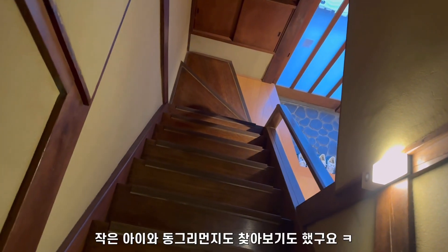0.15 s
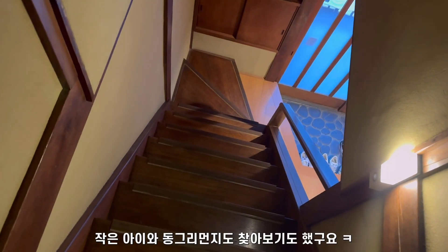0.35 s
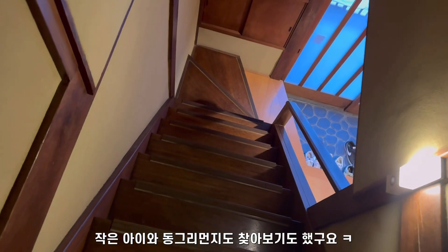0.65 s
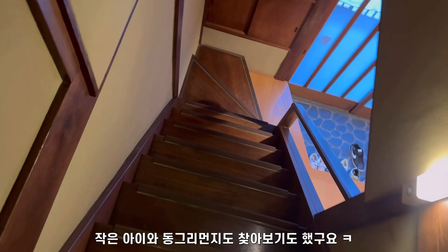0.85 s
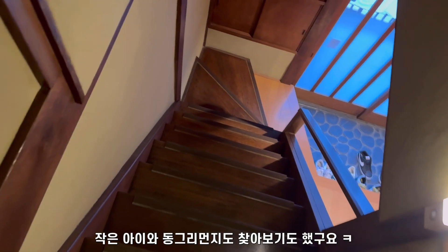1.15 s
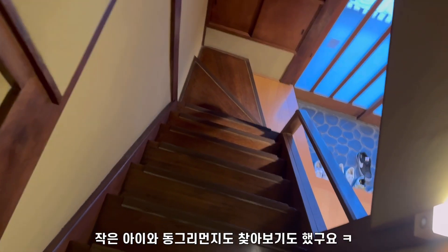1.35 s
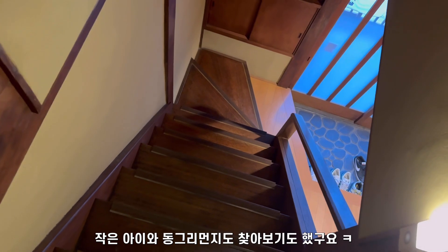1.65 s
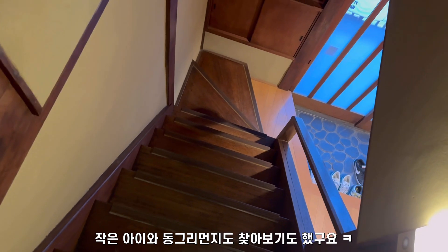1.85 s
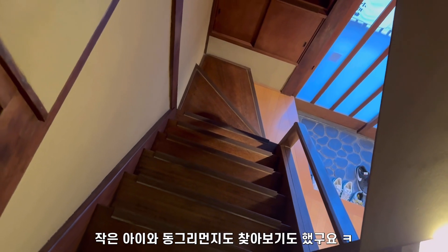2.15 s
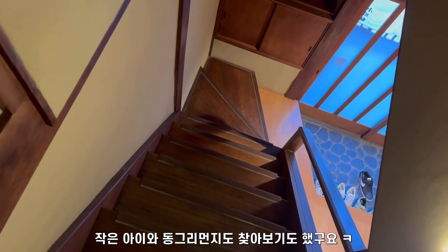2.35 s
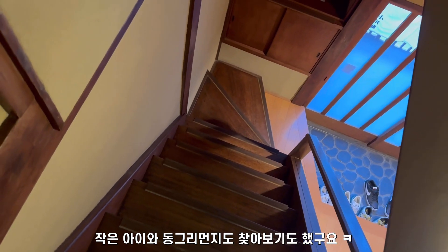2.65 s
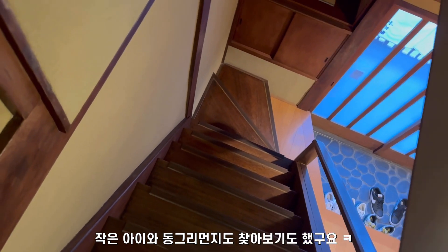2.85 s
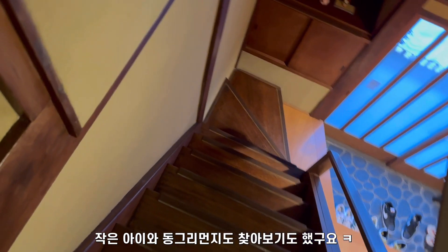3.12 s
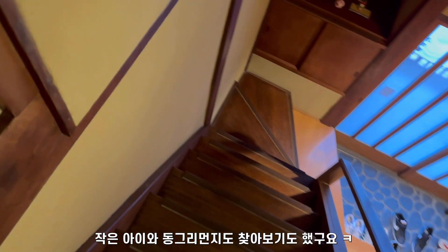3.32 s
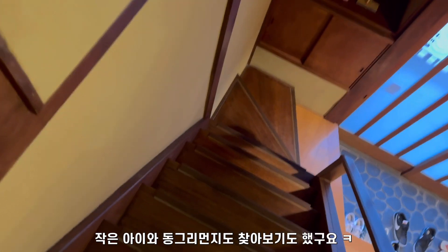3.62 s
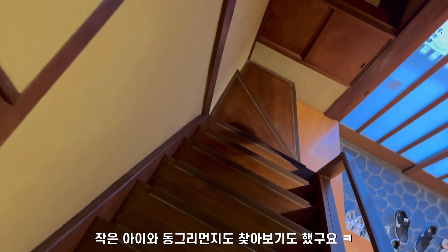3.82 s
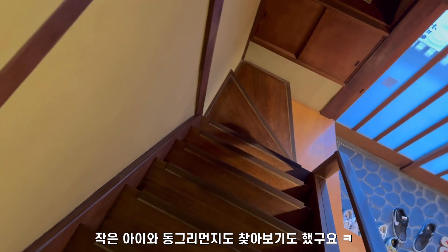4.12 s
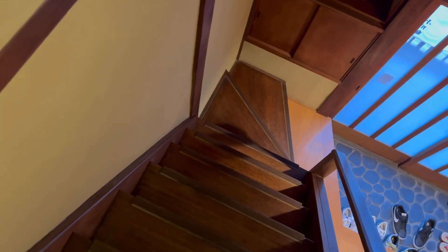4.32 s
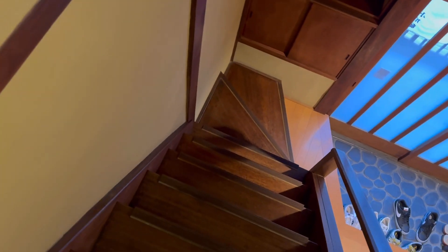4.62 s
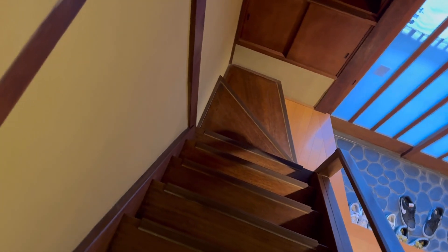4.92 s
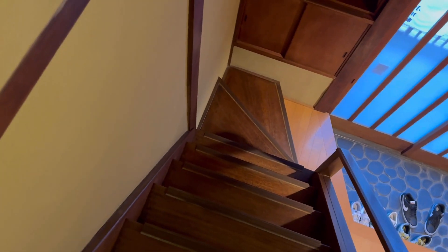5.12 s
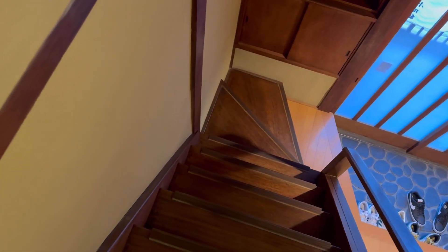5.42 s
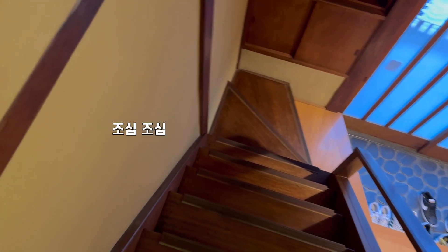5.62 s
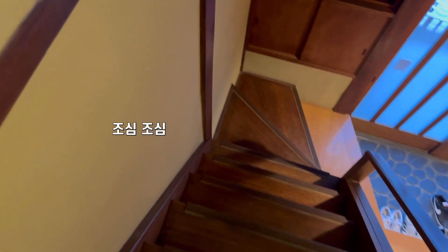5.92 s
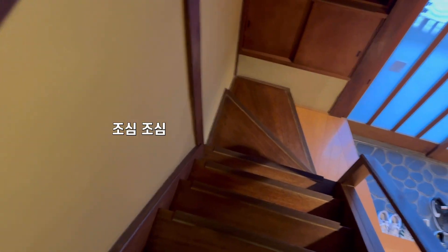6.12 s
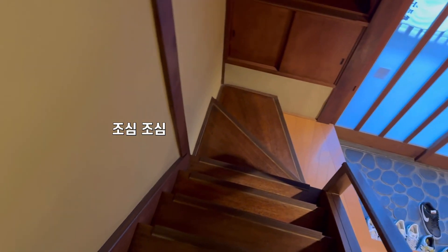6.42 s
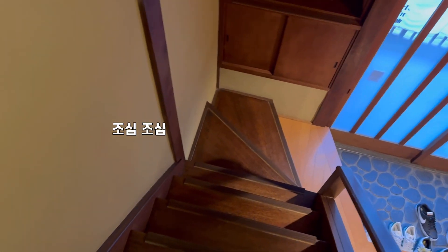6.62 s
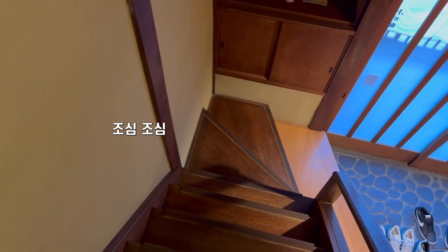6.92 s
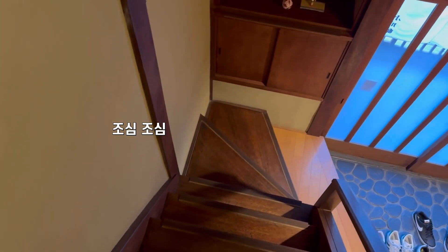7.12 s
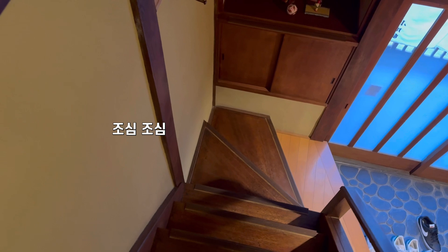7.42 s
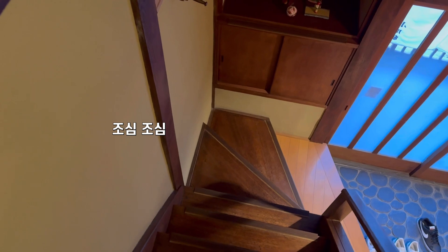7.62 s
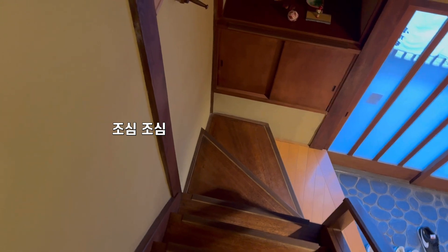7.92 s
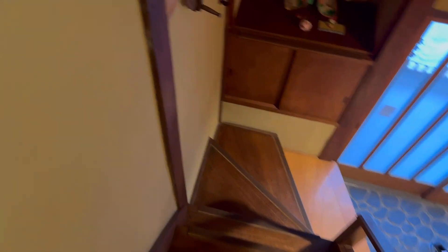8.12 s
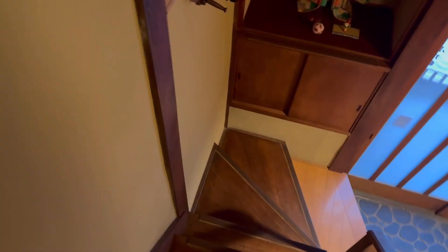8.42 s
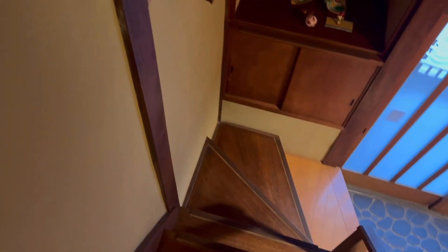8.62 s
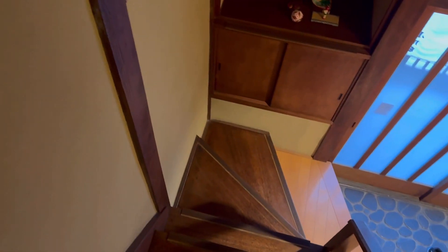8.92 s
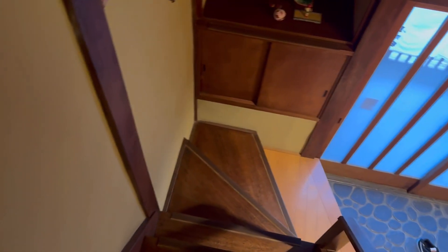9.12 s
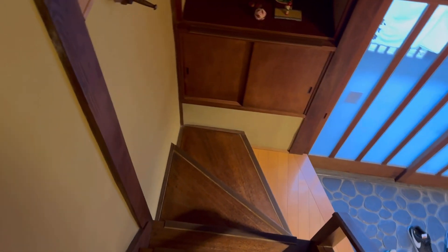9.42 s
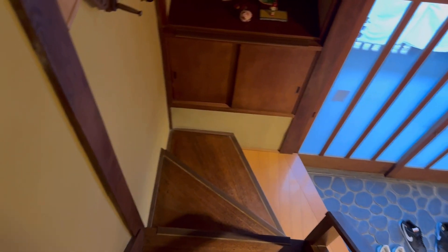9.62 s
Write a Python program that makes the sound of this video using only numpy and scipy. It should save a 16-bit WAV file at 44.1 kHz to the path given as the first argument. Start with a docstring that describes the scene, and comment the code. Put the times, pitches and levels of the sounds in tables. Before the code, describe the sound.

Close, quiet stereo sound inside a narrow wooden stairwell. Soft heels press old treads; early on the wood gives a harsh, rattling creak of many fast cracks that slow as it ends. A lull follows, then single snaps and knocks, the heaviest with a deep thump around three seconds, among uneven muffled steps, sock rubs and clothing rustle. Low timber rumble persists, and dull wash from outside swells last.

```python
"""Someone in socks comes slowly down a steep wooden staircase in an old house.
After faint cracks and soft steps, a loaded joint slips again and again in one long stuttering creak.
Then single cracks, thumping steps and rubbing socks follow; each crack rings briefly in the stairwell.
Clothes brush and timber rumbles all along; the wash from outside grows towards the end.
Wood is made of fading sine waves, cracks of short noise bursts, cloth and wash of coloured noise."""
import sys
import numpy as np
from scipy import signal
from scipy.fft import rfft, irfft, next_fast_len
from scipy.io import wavfile
from scipy.ndimage import uniform_filter1d

SR = 44100
rng = np.random.default_rng(int(sys.argv[2]) if len(sys.argv) > 2 else 0)


def master(y):
    """Save y as 16-bit WAV."""
    cut = np.clip(np.atleast_2d(y).T, -1, 1)
    pcm = np.round(cut * 32767)  # scale
    wavfile.write(sys.argv[1], SR, pcm.astype(np.int16))


N = 429975  # length in samples

# Joints slipping under load: start_s, level_db, then against that level snap_db (treble) and knock_db (wood),
# knock_hz (pitch the tread favours), grip_hz (lowest resonance of the gripping fibres)
JOINT_SLIPS = [(0.0448, -50, -31, 10, 314, 1190), (0.0863, -48, -4.5, 4, 316, 1175),
               (0.1388, -49, -22, 15, 310, 1144), (0.751, -27.5, -7.5, 6, 720, 1984),
               (0.7832, -24, -6, 5, 444, 1980), (0.8257, -23.5, -4.5, 4.5, 460, 2000),
               (0.852, -23.5, -5.5, 1, 301, 1920), (0.8815, -23.5, -5.5, 7, 440, 1945),
               (0.9099, -23, -7, 6, 680, 1970), (0.9312, -24, -4, 7, 683, 1970),
               (0.9497, -23.5, -5.5, 5, 298.3, 1963), (0.9708, -23, -5.5, 0.5, 395.7, 1970),
               (0.9867, -23, -3, 2, 450, 1900), (1.008, -19.5, -4.5, 3.5, 460, 1952),
               (1.0305, -24.5, -3.5, 7, 729, 1561), (1.0499, -24, -1.5, 7, 715, 1854),
               (1.0775, -20.5, -9, 5.5, 511.5, 1460), (1.1135, -27, -3.5, 12, 720, 1405),
               (1.1477, -23, -5, 2.5, 430, 1520), (1.2133, -28.5, -3, 12, 880, 1430),
               (1.303, -26.5, -4, 13.5, 930, 1443), (2.0459, -60, -5, 8, 436, 1576),
               (2.2374, -42.5, -6, 8, 383, 1535), (2.25, -46.5, 2.5, 17, 390, 1500),
               (2.571, -44.5, -17, 9, 450, 1010), (2.7512, -62, 4, 0, 304, 1920),
               (3.1263, -52.5, 9, 11, 396, 1440), (3.2068, -28, -13.5, -2.5, 400, 1610),
               (3.2292, -27.5, -8.5, 3.5, 296, 1930), (3.356, -55, 0, 12.5, 312, 1860),
               (3.3789, -35, 2.5, 4.5, 570, 1490), (3.5981, -50.5, -1.5, 12.5, 331, 1820),
               (4.001, -42.5, 3.5, 7, 385, 1470), (4.0519, -36.5, -2.5, 11.5, 478, 1000),
               (4.112, -50, -10.5, 1, 400, 1520), (4.535, -70.5, -8, 18.5, 418, 1500),
               (4.5924, -30, -3.5, 3.5, 406, 1910), (4.8843, -61, 5, 6.5, 420, 2000),
               (5.0064, -46, -3, 7.5, 393, 2380), (5.372, -62, -1.5, -19.5, 883, 1496),
               (5.4886, -36, -17.5, 7, 424, 1730), (5.753, -60, -2, 9, 427, 1540),
               (5.832, -45.5, -5, -4, 336, 1940), (5.8738, -39, -25, 3, 392, 1604),
               (5.9856, -44, -8, 4.5, 304, 1270), (6.0208, -54.5, -0.5, -8, 318, 1710),
               (6.2014, -60, -11, 5.5, 439, 1400), (7.013, -60, -5, 5, 303, 2360),
               (7.1906, -32, -8, 5, 503, 1287), (7.329, -59, 4, -5, 297, 2170),
               (7.5597, -57.5, -1, 13, 310, 2000), (8.109, -65.5, -17, 14, 920, 1440),
               (8.203, -29, -8.5, 6, 286, 1348), (8.2842, -56.5, 5.5, 11, 490, 1430),
               (8.349, -68.5, 14, 1, 568, 1840), (8.4268, -52.5, -2.5, -16, 511, 1480),
               (8.479, -49.5, -6.5, -5, 316, 1980), (8.6192, -63, -6.5, 7.5, 374, 1200),
               (9.046, -69.5, 1, 18, 450, 1520), (9.12, -59.5, -2.5, 1, 409, 1850)]
# Weight landing on a tread: landing_s, board_peak_db, beam_peak_db, frame_peak_db, contact_ms
FOOTFALLS = [(0.053, -43, -61, -56, 13), (0.142, -43, -51, -62, 10), (0.383, -44.5, -39, -67, 15.5),
             (0.554, -45.5, -68, -67, 17), (0.922, -27, -56, -43, 15), (0.998, -23, -52, -38.5, 13),
             (1.218, -26.5, -45, -36, 7.5), (1.307, -26.5, -40, -52.5, 2.4), (1.688, -56.5, -69, -62.5, 20),
             (2.054, -45.5, -77, -61, 49), (2.248, -37.5, -52, -56, 8.2), (2.348, -54, -64, -69, 19),
             (2.518, -53, -67, -65, 7.1), (2.561, -42, -50.5, -57, 19), (2.772, -51, -50, -68, 5.3),
             (2.971, -63, -60.5, -76, 14), (3.136, -48, -62, -71, 7.8), (3.241, -24.5, -37, -41, 17),
             (3.383, -30.5, -27, -23.5, 18), (3.604, -40, -52, -60.5, 25), (3.677, -44, -53, -50, 8.4),
             (3.866, -57.5, -64.5, -79, 14), (4.009, -38, -50, -67, 10), (4.066, -38, -42.5, -53, 21),
             (4.54, -43, -72, -50, 32), (4.791, -60, -62, -56.5, 32), (5.005, -42, -55, -51.5, 18),
             (5.5, -44.5, -57, -53.5, 71), (5.751, -62, -75, -58, 25), (5.837, -42.5, -65, -40, 18),
             (6.008, -48, -50, -39.5, 15), (6.205, -50.5, -71, -65, 8.2), (6.424, -47.5, -58, -54, 24),
             (6.548, -62.5, -60, -65, 29), (6.862, -64.5, -59, -76, 14), (7.044, -51, -54, -56, 5),
             (7.204, -39, -68, -65, 36), (7.335, -42.5, -55, -49, 14), (7.493, -52.5, -51.5, -86, 31),
             (7.562, -44.5, -47, -59, 14), (7.917, -57.5, -56, -57.5, 27), (8.115, -49, -57, -63, 17),
             (8.2, -30.5, -30, -35.5, 25), (8.354, -49, -69, -48, 35), (8.494, -40, -57, -50, 18.4),
             (8.615, -57, -61, -67, 12), (8.85, -53.5, -53.5, -58, 32), (9.045, -50, -47, -64, 12),
             (9.116, -50, -61, -73.5, 18), (9.336, -49.5, -73, -58.5, 14.4), (9.633, -56.5, -74, -62, 18)]
# Ringing tones of the staircase, by part: frame, beams, boards, treads. Columns: pitch_hz,
# level_db (relative), t60_s (time to fall by 60 dB, before the foot shortens it)
FRAME_TONES = [(39.2, -11, 0.94), (50.7, -7.5, 1), (59.64, 14, 0.49)]
BEAM_TONES = [(71.15, -9.5, 0.98), (85.4, -2, 0.28), (102.4, -4.5, 0.15)]
BOARD_TONES = [(118.8, -4.5, 0.34), (146.64, -1, 0.41), (161.3, -8.5, 0.4), (186.5, -7, 0.32),
               (232.3, -10, 0.24)]
TREAD_TONES = [(274.4, -4, 0.33), (310, -2, 0.23), (350.8, -15, 0.57), (400.3, -3, 0.22),
               (448.2, 0.5, 0.25), (498, -5.5, 0.26), (561, -1, 0.23), (604.5, -13, 0.3), (683, 3, 0.11),
               (736.4, -3.5, 0.26), (772.5, -9, 0.14), (923.5, 0.5, 0.087), (980, -5.5, 0.32),
               (1065, 0, 0.089), (1246, 2, 0.16), (1219, -1, 0.14), (1440, -15.5, 0.068),
               (1619, -12.5, 0.087)]
# Bands of a crack and its echo in the stairwell: centre_hz, level_db, first_t60_s,
# echo_db (against the band), echo_t60_s
CRACK_BANDS = [(483.4, -0.5, 0.15, -2, 0.46), (945, -3, 0.19, -3, 0.39), (2000, 2, 0.027, -10, 0.3),
               (3480, -6, 0.01, -1, 0.15), (4850, -5.5, 0.022, -5, 0.24), (7240, 0.5, 0.019, -10, 0.17),
               (10300, 6.5, 0.01, -12.5, 0.11), (15200, 3, 0.04, -10, 0.037)]
# Steady movement of the walker: time_s, hiss_db (clothes), scuff_db, rumble_db (timber)
MOVEMENT = [(0, -76, -75, -62), (.15, -81, -87, -55), (.35, -70, -71, -69), (.7, -71.5, -69, -65.5),
            (1.45, -69.5, -69, -65.5), (1.86, -76, -81.5, -70), (2.2, -77, -78.5, -72),
            (2.65, -71, -66, -60.5), (2.9, -72, -74, -71), (3.3, -68, -70, -67), (3.7, -77.5, -75, -77),
            (4.06, -72.5, -73.5, -63), (4.4, -73, -78.5, -72), (4.85, -76, -71.5, -62),
            (5.08, -82.5, -85, -75), (5.4, -81.5, -89.5, -71.5), (5.66, -71, -74, -65),
            (6.05, -66.5, -72.5, -52.5), (6.25, -76, -76, -66.5), (6.55, -72, -81.5, -71.5),
            (7.1, -74, -73.5, -67.5), (7.55, -79.5, -82.5, -75), (8.15, -75, -75, -67.5),
            (8.3, -68, -68, -54), (8.65, -73, -81.5, -64.5), (9, -72.5, -75, -67.5),
            (9.45, -82.5, -80, -66.5), (9.75, -82, -80.5, -64)]
# Socks rubbing over a tread: middle_s, rub_db (dull part), hiss_db (both before a common trim), half_length_ms
SOCK_RUBS = [(0.088, -40, -57.5, 26.4), (0.188, -54, -92, 24), (0.399, -70, -60.5, 15),
             (0.569, -61.5, -61, 38), (1.549, -59.5, -62.5, 62), (1.851, -73, -64, 35),
             (2.071, -56.5, -66, 22), (2.309, -48.5, -67, 56), (2.502, -54.5, -58, 21),
             (2.568, -41, -50.5, 28.5), (2.77, -59, -59, 31), (3.169, -48, -64.5, 30),
             (3.289, -43.5, -65, 56), (3.419, -45, -65, 33), (3.649, -50, -62.5, 39),
             (4.108, -42.5, -57.5, 56), (4.659, -49, -58.5, 26), (4.997, -50, -52.5, 36),
             (5.569, -51.5, -62, 56), (5.85, -48, -54.5, 25), (5.909, -47, -61.5, 37),
             (6.044, -56.5, -60, 79), (6.245, -59, -72, 15), (6.459, -59, -65, 49), (6.554, -55, -62, 34),
             (7.029, -58.5, -81, 23), (7.139, -61.5, -80, 77), (7.279, -49, -69, 81), (7.346, -69, -54, 28),
             (7.518, -53.5, -57, 28), (7.579, -52.5, -62, 37), (7.94, -71.5, -63.5, 23),
             (8.109, -57.5, -71.5, 14), (8.279, -49.5, -58.5, 66), (8.503, -46.5, -66, 33),
             (8.615, -53, -65, 45), (8.881, -62, -61.5, 31), (9.633, -58, -65.5, 22)]
# Far wash from outside: time_s, level_db
WASH_LEVEL = [(0, -77), (1.6, -81), (4.4, -78.5), (5.2, -88.5), (5.7, -77), (7.8, -80.5), (8.7, -73.5),
              (9.1, -68.5), (9.4, -67.5), (9.75, -67.5)]
# Colours of the noises: pitch_hz, level_db (relative, per Hz)
HISS_COLOUR = [(1760, -39.5), (3000, -5), (3490, -12), (3780, -19.5), (4430, -11.5), (4800, -2),
               (5800, -0.5), (9220, 3.5), (10900, 4), (14200, -48), (22000, -120)]
SCUFF_COLOUR = [(530, -20), (900, -22), (1170, -5.5), (2130, -5), (2370, -5), (4500, -9), (5850, -45.5),
                (9900, -120)]
RUB_COLOUR = [(120, -36), (200, -3.5), (399, -2), (574, -6.5), (657, -17), (976, -12.5), (1060, -16),
              (1500, -21.5), (1950, -74), (3300, -120)]
WASH_SPECTRUM = [(200, -29), (280, -9), (430, -1), (540, -3.5), (660, -1.5), (800, -5.5), (1000, -7),
                 (1350, -12), (1700, -22), (2500, -41)]
RUMBLE_SPECTRUM = [(15, -32.5), (25, -17.5), (54, 0), (76, -5), (145, -7), (211, -25.5), (300, -18),
                   (390, -52.5), (660, -120)]
# How alike the two microphones hear: pitch_hz, correlation (1 same, -1 opposite)
STEREO_LIKENESS = [(60, 1), (130, 0.97), (290, 0.66), (600, -0.41), (1200, -1), (3000, 0.66), (5400, 0.64),
                   (6100, 0.81), (15000, 0.9)]
# Phase by which the right side leads: pitch_hz, lead_rad
RIGHT_LEAD = [(300, 0), (1000, 1.5), (5000, 1.5), (6100, 0), (7600, .9), (10300, 2.3), (15000, 3.7)]
# Tone of the microphones: pitch_hz, gain_db
MICROPHONE_TONE = [(25, -11.5), (45, 0.5), (10300, -1), (10900, -5.5), (11800, -29.5), (13700, -25),
                   (14600, -5.5), (15700, -13), (16300, -49)]

RING, SLIP_RING, FOOT_RING = 24576, 12288, 16384  # lengths in samples
SAME_JOINT_S = .095  # slips closer than this come from one joint
BOOM_DB = -10  # board against the knock
# second fibre resonance as a multiple of the lowest, and its scatter; range of the thin top resonance
FIBRE_RATIO, FIBRE_SCATTER, THIN_HZ, FIBRE_DB = 1.455, 0.024, (3900, 8920), -2.5
SPIKE, SPIKE_T60_S = 1.3, 0.015  # extra treble strength at the start of a crack, and how fast it goes
BOARD_RING, BEAM_RING, FRAME_RING = 0.86, 0.63, 0.65  # the foot shortens each ring to this share
# the scuff lies this share of the way from hiss to dull rub, plus dB
SCUFF_SHARE, RUB_SCUFF_DB = 0.16, -2
STIR_DB, STIR_T60_S = -16.5, 0.95  # rumble after a landing, against the frame
TOP_HZ = 16850  # little is heard above this


def joints():
    """Every slip cracks and knocks tread and board; quick slips come from one joint and knock alike."""
    out, last_s = np.zeros((2, N)), -1
    t = np.arange(SLIP_RING) / SR
    for start_s, level_db, snap_db, knock_db, knock_hz, grip_hz in JOINT_SLIPS:
        if start_s - last_s > SAME_JOINT_S:
            grain = pair_noise(SLIP_RING)[1]
            on_tread, on_board = spot(TREAD_TONES), spot(BOARD_TONES)
        last_s = start_s
        second_hz = grip_hz * FIBRE_RATIO * (1 + FIBRE_SCATTER * rng.standard_normal())
        bright_hz = (grip_hz, second_hz, rng.uniform(*THIN_HZ))

        # tones near the favoured pitch take most of the blow
        tones = np.array(TREAD_TONES)
        octaves_away = np.abs(np.log2(tones[:, 0] / knock_hz))
        tones[:, 1] -= np.minimum(7 * octaves_away, 11)

        # the grip shifts a little from slip to slip
        tread = ring(tones, .5 * on_tread + 0.44 * spot(TREAD_TONES), SLIP_RING)
        board = ring(BOARD_TONES, .5 * on_board + 0.62 * spot(BOARD_TONES), SLIP_RING)

        # the wood takes a few ms to swing up; the tread's first swings are strongest
        tread *= (1 - np.exp(-(t / 0.0035) ** 2)) * (1 + 1.9 * np.exp(-t / 0.006))
        tread *= 0.67 * undb(knock_db)
        board *= (1 - np.exp(-t / 0.0036)) * np.cos(np.pi * t / t[-1] / 2)
        board *= undb(knock_db + BOOM_DB)

        fibre_tones = [(hz, db, 0.061 * np.sqrt(2000 / hz)) for hz, db in zip(bright_hz, (0, -5, snap_db))]
        fibres = ring(fibre_tones, 0.13 * spot(fibre_tones), SLIP_RING)
        fibres *= undb(FIBRE_DB) * (1 - np.exp(-t / 0.00049))
        burst = 1.024 * crack(grain, snap_db, bright_hz) * (1 - np.exp(-t / 0.0011))
        add(out, undb(level_db) * (burst + fibres + tread + board), start_s)
    return out


def crack(grain, snap_db, bright_hz):
    """Noise favouring the fibre resonances; each band dies fast, then trails off in the stairwell."""
    hz, fresh = pair_noise(SLIP_RING)
    white = (grain + fresh) / np.sqrt(2)  # half belongs to the joint, half to this slip
    peaks = sum(1 / (1 + ((hz - f) / (.03 * f)) ** 2) for f in bright_hz)
    bright = white * (.6 + peaks)
    centres = np.array(CRACK_BANDS)[:, 0]
    out = 0
    for k, (centre, db, first_t60, echo_db, echo_t60) in enumerate(CRACK_BANDS):
        # neighbouring bands blend into each other
        this_band = np.transpose([centres, np.arange(len(centres)) == k])
        share = np.sqrt(along(this_band, hz) * (hz > centres[0] / 2))
        spike = SPIKE * (centre > 2500) * fade(SPIKE_T60_S, SLIP_RING)
        direct = irfft(bright * share) * (fade(first_t60, SLIP_RING) + spike)
        trail = undb(echo_db) * irfft(white * share) * fade(echo_t60, SLIP_RING)
        out = out + undb(db + snap_db * (centre > 4500)) * (direct + trail)
    return out


def feet():
    """A soft heel loads board, beam and frame over its contact time; the heavy parts answer latest."""
    out = np.zeros((2, N))
    t_ms = 1000 * np.arange(FOOT_RING) / SR
    for landing_s, board_db, beam_db, frame_db, contact_ms in FOOTFALLS:
        # tones, peak level, build-up as a multiple of the contact time, share of the ring left
        parts = ((BOARD_TONES, board_db, .9, BOARD_RING),
                 (BEAM_TONES, beam_db, 1.2, BEAM_RING),
                 (FRAME_TONES, frame_db, 1.6, FRAME_RING))
        for tones, peak_db, lag, share in parts:
            shortened = np.array(tones) * [1, 1, share]
            build_up = 1 - np.exp(-(t_ms / (lag * max(contact_ms, 2))) ** 2)
            thump = ring(shortened, spot(tones), FOOT_RING) * build_up
            # the build-up begins just before the listed time
            add(out, undb(peak_db) * thump / np.abs(thump).max(), landing_s - .012)
    return out


def cloth():
    """Each rub swells and fades, gritty as fibres catch, over the steady brushing of clothes."""
    t = np.arange(N) / SR
    power = np.zeros((3, N))  # rub, scuff, hiss
    for middle_s, rub_db, hiss_db, half_ms in SOCK_RUBS:
        near = slice(max(int((middle_s - .2) * SR), 0), int((middle_s + .2) * SR))
        scuff_db = hiss_db + SCUFF_SHARE * (rub_db - hiss_db) + RUB_SCUFF_DB
        swell = np.exp(-(1000 * (t[near] - middle_s) / max(half_ms, 5)) ** 2)
        power[:, near] += undb([[rub_db], [scuff_db], [hiss_db]]) ** 2 * swell
    power *= (.38 * flicker(150, depth_db=4.5)) ** 2  # common trim and grit
    hiss_db, scuff_db, _ = curves(MOVEMENT)
    power[1:] += (undb([scuff_db, hiss_db]) * flicker(40, depth_db=1.5)) ** 2
    rub, scuff, hiss = np.sqrt(power)
    return rub * coloured(RUB_COLOUR) + scuff * coloured(SCUFF_COLOUR) + hiss * coloured(HISS_COLOUR)


def house():
    """Noise for the wash outside, and for timber rumbling with movement and after each landing."""
    wash = undb(curves(WASH_LEVEL)[0]) * flicker(26, depth_db=3.0) * coloured(WASH_SPECTRUM)
    power = undb(curves(MOVEMENT)[-1:]) ** 2
    for landing_s, _, _, frame_db, _ in FOOTFALLS:
        stir = undb(frame_db + STIR_DB) * fade(STIR_T60_S)[None]
        add(power, stir ** 2, landing_s)
    return wash + np.sqrt(power) * coloured(RUMBLE_SPECTRUM)


def ring(tones, chance, size):
    """Wood struck at one spot rings in fading sine waves, peak 1; chance varies each one."""
    hz, db, t60 = np.transpose(tones)[:, :, None]
    tuning, strength, stereo, start_phase = chance
    phase = 2 * np.pi * hz * (1 + .008 * tuning) * np.arange(size) / SR + 2 * start_phase
    # less alike at the two microphones means further apart in phase
    skew = stereo * np.arccos(np.clip(along(STEREO_LIKENESS, hz), -1, 1)) / 2
    swing = undb(db + 3 * strength) * fade(t60, size)
    left = np.sum(swing * np.sin(phase - skew), axis=0)
    right = np.sum(swing * np.sin(phase + skew + along(RIGHT_LEAD, hz)), axis=0)
    x = np.array([left, right])
    return x / np.abs(x).max()


def spot(tones):
    """Draws the chance of one place on the wood: tuning, strength, stereo and phase of each tone."""
    return rng.standard_normal((4, len(tones), 1))


def pair_noise(size):
    """White noise spectra at two microphones: a shared part and an opposed part, the right shifted in phase."""
    hz = np.fft.rfftfreq(size, 1 / SR)
    mid, side = rfft(rng.standard_normal((2, size)))
    like = np.clip(along(STEREO_LIKENESS, hz), -1, 1)
    mid = mid * np.sqrt((1 + like) / 2)
    side = side * np.sqrt((1 - like) / 2)
    right = (mid - side) * np.exp(1j * along(RIGHT_LEAD, hz))
    return hz, np.array([mid + side, right])


def coloured(points):
    """Steady stereo noise with the given spectrum and an average (rms) strength of 1."""
    size = next_fast_len(N)
    hz, white = pair_noise(size)
    inside = (hz > points[0][0]) & (hz < points[-1][0])
    x = irfft(white * undb(along(points, hz)) * inside, size)[:, :N]
    return x / np.sqrt(np.mean(x ** 2))


def flicker(rate_hz, depth_db):
    """A gain that wanders at random, heading for a new value rate_hz times a second."""
    k = int(SR / rate_hz)
    steps = np.repeat(rng.standard_normal(N // k + 1), k)
    return undb(depth_db * uniform_filter1d(steps, k)[:N])


def fade(t60, size=RING):
    """Falls by 60 dB in t60 seconds, as a ringing body loses energy."""
    return np.exp(-np.log(1000) * np.arange(size) / SR / np.maximum(t60, .004))


def undb(db):
    """Decibels to gain."""
    return 10 ** (np.asarray(db) / 20)


def along(points, hz):
    """Reads a table of pitch and value between its points, on a log-frequency axis."""
    f, v = np.transpose(points)
    return np.interp(np.log(np.maximum(hz, 1)), np.log(f), v)


def curves(table):
    """Each column of a table that starts with time, sample by sample."""
    s, *columns = np.transpose(table)
    return [np.interp(np.arange(N) / SR, s, c) for c in columns]


def add(out, x, start_s):
    """Mixes x into out from start_s on."""
    i = int(start_s * SR)
    out[:, i:i + x.shape[1]] += x[:, :N - i]


def scene():
    """All that sounds in the stairwell."""
    return joints() + feet() + cloth() + house()


def record(dry):
    """The microphones weaken the deepest bass and dip above 11 kHz; a steep filter cuts the top."""
    size = next_fast_len(N + RING)
    gain = undb(along(MICROPHONE_TONE, np.fft.rfftfreq(size, 1 / SR)))
    heard = irfft(rfft(dry, size) * gain, size)[:, :N]
    top_cut = signal.ellip(10, .2, 80, TOP_HZ, fs=SR, output="sos")
    return signal.sosfilt(top_cut, heard)


dry = scene()
out = record(dry)
master(out)
```